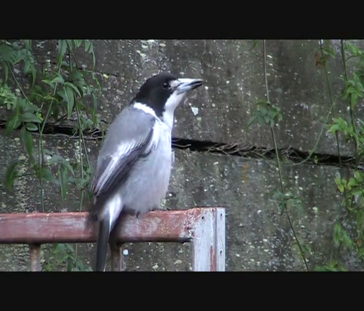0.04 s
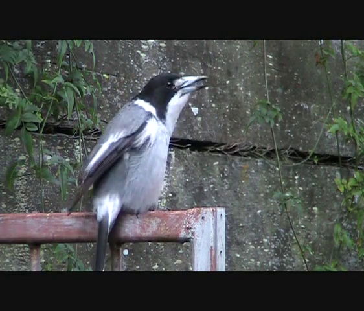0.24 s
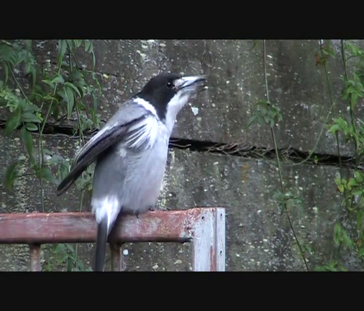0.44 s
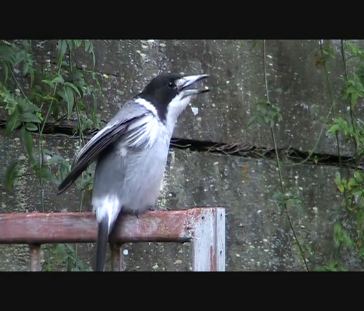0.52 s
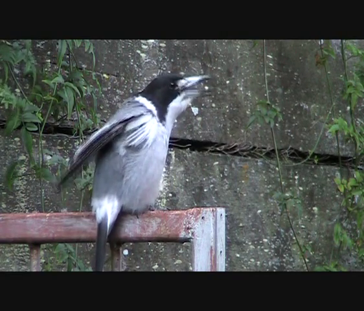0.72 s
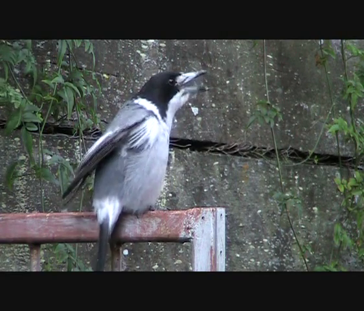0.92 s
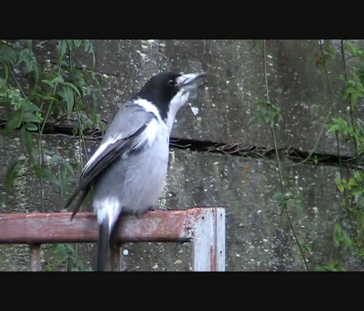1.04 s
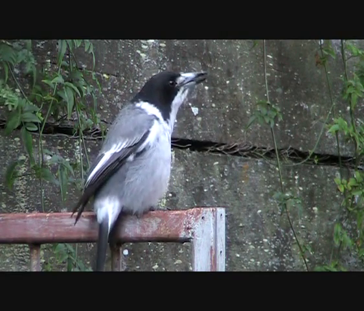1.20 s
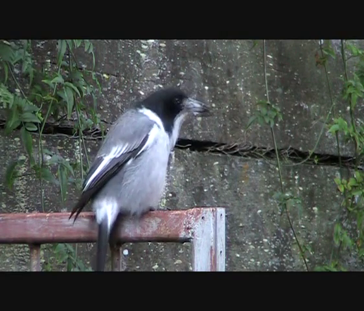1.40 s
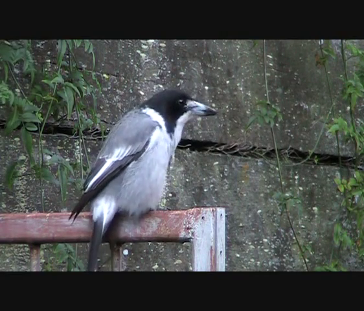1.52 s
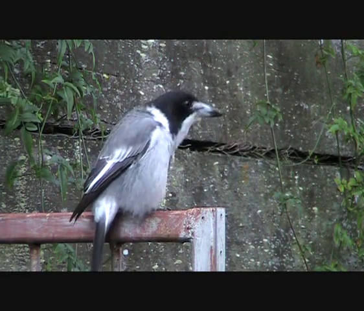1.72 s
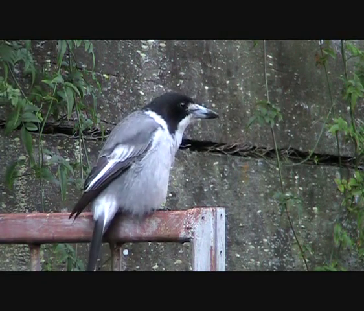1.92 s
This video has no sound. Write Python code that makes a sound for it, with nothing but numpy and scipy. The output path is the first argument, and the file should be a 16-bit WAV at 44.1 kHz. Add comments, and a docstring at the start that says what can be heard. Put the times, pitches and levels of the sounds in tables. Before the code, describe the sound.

A bird gives harsh rasps, whistles and a soft hoot close by outdoors.

```python
"""In a garden, a butcherbird calls from a rail close by: two harsh rasps that climb in steps, a run of
rough whips and high whistles with the beak wide open, then a soft hoot and a piping note with it nearly
shut. The two sides of its voice box (the syrinx) beat against each other, and its throat and beak shape
the tone. A wall and the yard answer the calls over soft outdoor air and a quiet rumble."""
import sys
import numpy as np
from scipy import signal
from scipy.fft import rfft, irfft, next_fast_len
from scipy.io import wavfile
from scipy.ndimage import uniform_filter1d, minimum_filter1d, map_coordinates

SR = 44100
rng = np.random.default_rng(int(sys.argv[2]) if len(sys.argv) > 2 else 0)


def unload_audio(sound):
    """Save the sound as a 16-bit wav file, at the path given as the first command line argument."""
    columns = np.transpose(np.atleast_2d(sound))
    # keep every value between -1 and 1, then stretch to whole-number steps
    steps = np.round(np.clip(columns, -1, 1) * 32767)
    wavfile.write(sys.argv[1], SR, steps.astype(np.int16))


N = 85995
TIME = np.arange(N) / SR


# One path per rasp (time [s], pitch [Hz], body level [dB], treble level [dB], roughness [1 = full])
RASP_PATHS = [
    [(.207, 621.8, -37.5, -66, 1.22), (.237, 713, -21.5, -46.5, 0.49), (.27, 709.8, -22.5, -41.5, 0.36),
     (.314, 766, -16.5, -40, 0.23), (.324, 879.4, -26, -36.5, 1.06), (.341, 826.3, -14.5, -33.5, 0.86),
     (.353, 790, -16.5, -34.5, 0.01), (.384, 807, -13.5, -35, 0.25), (.392, 852, -15, -30, 0.41),
     (.423, 912.7, -13.5, -27, 0.39), (.43, 1103, -18.5, -34.5, 0.51), (.44, 956, -25.5, -31, 1.1)],
    [(.556, 903, -23, -46, 0.52), (.568, 891.6, -16, -32.5, 0.39), (.598, 826.3, -16, -32.5, 0.39),
     (.614, 905, -12.5, -33, 0.22), (.645, 882.7, -16.5, -28, 0.27), (.654, 948, -13.5, -34.5, 0.24),
     (.668, 955, -12.5, -30, 0.32)],
]
# How the throat and the open beak shape a rasp (frequency [Hz], gain [dB])
RASP_THROAT_SHAPE = [(400, -57), (680, -10.5), (900, -23.5), (1100, -8.5), (1400, 2), (1750, 2.5),
                     (2200, -8.5), (2600, -12), (3400, -18.5), (4000, -40.5)]
RASP_BEAK_SHAPE = [(2700, -21), (3500, -8), (4800, -11.5), (6100, 4), (7000, -5.5), (7900, 1.5),
                   (11000, -8.5), (13000, -10), (15500, -22)]

def rasps():
    """Two harsh, hissy calls that climb in steps."""
    return sum(call(path, RASP_THROAT_SHAPE, RASP_BEAK_SHAPE, hiss=5) for path in RASP_PATHS)


# Flick and whip paths (time [s], pitch [Hz], body level [dB], treble level [dB], roughness [1 = full])
FLICK_PATH = [(.676, 1036, -16, -27.5, 0.45), (.693, 1153, -18.5, -30, 0.42), (.714, 958, -27.5, -30, 0.79)]
WHIP_PATHS = [
    [(.794, 1077, -31, -43, 0.22), (.808, 1039, -20.5, -35, 0.55), (.819, 1515, -11, -21, 0.48),
     (.828, 1697, -17.5, -20, 0.5), (.846, 1660, -32, -40, 0.35)],
    [(1.142, 1101, -27.5, -46.5, 0.44), (1.16, 1080, -21.5, -33, 0.72), (1.172, 1230, -26, -26, 0.81),
     (1.181, 1443, -13, -25.5, 0.57), (1.197, 1599, -9, -28.5, 0.65), (1.203, 1712, -10.5, -36, 0.45)],
]
# The throat for whips and whistles, and the beak for flick and whips (frequency [Hz], gain [dB])
HIGH_THROAT_SHAPE = [(600, -46), (1050, -5.5), (1800, -0.5), (2350, -7), (2900, -15.5), (3400, -30.5),
                     (5000, -71)]
WHIP_BEAK_SHAPE = [(2900, -39), (3600, -3), (5500, -8.5), (7400, 5.5), (8800, -7), (10500, -2),
                   (15500, -30)]

def whips(hiss=2.2):
    """A short flick ends the second rasp, then two rough calls sweep quickly upward."""
    flick = call(FLICK_PATH, RASP_THROAT_SHAPE, WHIP_BEAK_SHAPE, hiss)
    return flick + sum(call(path, HIGH_THROAT_SHAPE, WHIP_BEAK_SHAPE, hiss) for path in WHIP_PATHS)


# One path per whistle (time [s], pitch [Hz], body level [dB], treble level [dB], roughness [1 = full])
WHISTLE_PATHS = [
    [(.837, 2122, -18, -25, 0.43), (.847, 2295, -17.5, -23.5, 0.43), (.856, 2434, -26.5, -20.5, 0.15),
     (.876, 2426, -27.5, -27.5, 0.15)],
    [(.912, 2242, -19, -32, 0.12), (.92, 2200, -27, -38, 0.17), (.929, 2235, -11, -26.5, 0.11),
     (.942, 2317, -22.5, -22, 0.086), (.958, 2345, -32, -29.5, 0.071), (.966, 2270, -41, -42, .12)],
    [(1.012, 2195, -19, -37, 0.17), (1.024, 2394, -22, -24, 0.17), (1.032, 2164, -11, -33, 0.19),
     (1.042, 1981, -24.5, -20.5, 0.1), (1.054, 1900, -5.5, -24, 0.24), (1.068, 1778, -13.5, -29.5, 0.13)],
]
# How the open beak shapes a whistle (frequency [Hz], gain [dB])
WHISTLE_BEAK_SHAPE = [(3000, -31), (3800, -6.5), (4700, 3), (5600, -2.5), (7300, 2), (11400, -8),
                      (15000, -24)]

def whistles():
    """Three short, high notes through the wide-open beak."""
    return sum(call(path, HIGH_THROAT_SHAPE, WHISTLE_BEAK_SHAPE, hiss=4) for path in WHISTLE_PATHS)


# The closing notes (time [s], pitch [Hz], body level [dB], treble level [dB], roughness [1 = full])
REEDY_PATH = [(1.452, 735, -49, -66, .09), (1.468, 761.4, -30.5, -59, .1), (1.493, 748.6, -32.5, -60, .12)]
HOOT_PATH = [(1.446, 753, -46.5, -73, 0.072), (1.494, 746.4, -25, -71, 0.14),
             (1.536, 798.4, -18.5, -51, 0.028), (1.566, 813.4, -19, -54.5, 0.031),
             (1.6, 783, -21, -66, 0.078), (1.611, 772, -31, -74, 0.13)]
PIPE_PATH = [(1.719, 1021, -23, -44, .35), (1.728, 1059, -11.5, -43.5, 0.14),
             (1.75, 1072, -9.5, -39, 0.035), (1.757, 1064, -11.5, -45, 0.037),
             (1.774, 1051, -13.5, -40, 0.081), (1.785, 1076, -21, -62.5, 0.16),
             (1.806, 1150, -25, -58, 0.46), (1.84, 990, -35.5, -61.5, 0.62), (1.878, 783, -25.5, -65, 0.56),
             (1.895, 762, -34, -79, 0.87)]
# How the throat and beak shape those notes (frequency [Hz], gain [dB])
REEDY_THROAT_SHAPE = [(750, -37), (1500, 3), (2300, -2.5), (3400, -42)]
SHUT_THROAT_SHAPE = [(400, -4), (750, 7.5), (1100, .5), (1550, -13), (2100, -30.5), (2400, -27),
                     (3200, -40.5), (6000, -81)]
HOOT_BEAK_SHAPE = [(6000, -20), (7300, 7), (8000, -6), (9000, -19)]
PIPE_BEAK_SHAPE = [(2800, -45), (4300, -5), (5400, 0), (6400, 9), (8000, -9.5), (9600, -3.5), (14000, -6),
                   (15500, -11)]

def hoot_and_pipe():
    """The hoot starts reedy with the throat open; then the throat narrows for the rest of it and for the piping
    note."""
    reedy_start = call(REEDY_PATH, REEDY_THROAT_SHAPE, HOOT_BEAK_SHAPE)
    hoot = call(HOOT_PATH, SHUT_THROAT_SHAPE, HOOT_BEAK_SHAPE)
    pipe = call(PIPE_PATH, SHUT_THROAT_SHAPE, PIPE_BEAK_SHAPE)
    return reedy_start, hoot + pipe


def syrinx(hz, rough, count=20):
    """One side of the voice box: equally loud harmonics (multiples of a shaky pitch), one row each."""
    jitter = 0.0656 * wobble(704.2, len(hz))
    waver = 0.0487 * wobble(219.7, len(hz))
    pitch = hz * (1 + rough * (jitter + waver))
    harmonic = np.arange(1, count + 1)[:, None]
    phase = 2 * np.pi * (harmonic * np.cumsum(pitch) / SR + rng.random(harmonic.shape))
    return np.sqrt(2) * np.sin(phase) * (harmonic * pitch < SR / 2)


ATTACK_S, RELEASE_S = .005, .011
FLUTTER_DB, FLICKER_DB = 4, 4.5  # random swings of the whole call, and of each harmonic in the treble
BREATH = 0.57  # rushing air compared with the tone, at full roughness

def call(path, throat, beak, hiss=BREATH):
    """One call in two layers: the throat sounds its low body, the beak its treble."""
    times, *columns = np.transpose(path)
    fade_in = np.clip((TIME - times[0]) / ATTACK_S + 1, 0, 1)
    fade_out = np.clip((times[-1] - TIME) / RELEASE_S + 1, 0, 1)
    fade = fade_in * fade_out
    on = fade > 0
    hz, body_db, treble_db, rough = [np.interp(TIME[on], times, column) for column in columns]
    rough = np.clip(rough, 0, 1)
    # The second side sings a little lower and beats against the first.
    harmonics = (syrinx(hz, rough) + rough * syrinx(hz * .925, rough)) / np.hypot(1, rough)
    loudness = fade[on] * amp(FLUTTER_DB * rough * wobble(210.5, len(hz)))
    flicker = amp(FLICKER_DB * np.array([wobble(29.4, len(hz)) for _ in harmonics]))
    flickering = harmonics * flicker / np.sqrt(np.mean(flicker ** 2, axis=0))

    def layer(tones, shape, level_db, breath):
        """Tones and rushing air pass through the throat or the beak."""
        air_share = breath * rough ** 2
        air = air_share * rng.standard_normal(len(hz)) * np.sqrt(SR / 2 / hz)
        tone_hz = np.arange(1, len(tones) + 1)[:, None] * hz
        # Divide out what the shape and the air add, so level_db sets the loudness.
        boost = np.linalg.norm(amp(curve_at(shape, tone_hz)), axis=0) * np.hypot(1, air_share)
        buzz = np.zeros(N)
        buzz[on] = (tones.sum(0) + air) * loudness * amp(level_db) / boost
        return shaped(buzz, shape)

    body = layer(harmonics[:3], throat, body_db, BREATH)
    treble = layer(flickering, beak, treble_db, hiss)
    return np.array([body, treble])


# How far the left wave runs ahead of the right (frequency [Hz], phase lead [rad])
LEFT_LEAD = [(4000, 0.21), (7000, 0.56), (14000, 2.12)]

def direct_sound(voice):
    """The voice arrives straight from the bird, slightly out of step between left and right."""
    sides = np.array([[.5], [-.5]])
    return filtered(voice, lambda hz: np.exp(1j * sides * curve_at(LEFT_LEAD, hz)))


# Bounces off nearby surfaces (delay [s], level [dB])
NEAR_BOUNCES = [(.0112, -9), (.0205, -14.5)]

def wall_echo(voice):
    """Weak, early copies from the ground and the wall behind the bird, one from each side."""
    lag_s = 0.000092 * np.array([[.5], [-.5]])
    return sum(amp(db) * delayed(voice, delay_s + (-1) ** k * lag_s)
               for k, (delay_s, db) in enumerate(NEAR_BOUNCES))


# How long the yard rings (frequency [Hz], time to fade by 60 dB [s])
YARD_FADE = [(800, 0.32), (1700, 0.42), (8000, 0.23), (15000, 0.1)]

def yard_echo(voice):
    """Many bounces blur into one tail, each frequency dying at its own speed."""
    hz, t, spectrum = signal.stft(rng.standard_normal((2, SR * 3 // 4)), SR, nperseg=256)
    fade = amp(-60 * t / curve_at(YARD_FADE, hz)[:, None])
    tail = signal.istft(spectrum * fade, SR, nperseg=256)[1]
    tail = tail + 0.45 * tail[::-1]  # left and right partly blend
    tail = unit_level(tail) / np.sqrt(tail.shape[1])
    echo = signal.fftconvolve(voice[None], tail, axes=1)[:, :N]
    return delayed(echo, seconds=.007)


# The tone of the outdoor air (frequency [Hz], gain [dB])
AIR_SHAPE = [(20, -30), (35, 2), (130, -0.5), (450, -8), (750, -4), (1150, -7.5), (1700, -8), (2600, -15),
             (5000, -21.5), (15500, -41.5)]
# How alike it is on the left and right (frequency [Hz], likeness [0-1])
AIR_LIKENESS = [(110, 0.72), (250, 0.63), (8000, 0.25)]

def outdoor_air():
    """A soft, steady rush that sounds wider in the treble than in the bass."""
    def spread(hz):
        return np.arccos(curve_at(AIR_LIKENESS, hz)) / 2

    middle = filtered(noise(AIR_SHAPE), lambda hz: np.cos(spread(hz)))
    side = filtered(noise(AIR_SHAPE), lambda hz: np.sin(spread(hz)))
    return amp(-43.5) * unit_level(np.array([middle + side, middle - side]))


# Far-off tones (pitch [Hz], level [dB])
HUM_TONES = [(651, -52.5), (1620, -50)]

def distant_hums(waver_hz=28):
    """Two faint tones that waver at random."""
    hums = np.zeros(N)
    for hz, db in HUM_TONES:
        phase = 2 * np.pi * hz * TIME
        hums += amp(db) * (wobble(waver_hz) * np.sin(phase) + wobble(waver_hz) * np.cos(phase))
    return hums


# The tone of the rumble (frequency [Hz], gain [dB])
RUMBLE_SHAPE = [(40, -24), (66, 14), (100, -6.5), (200, -39)]
# Its loudness (time [s], level [dB])
RUMBLE_SWELL = [(1.3, -57.5), (1.549, -48), (1.95, -52)]

def rumble():
    """A low rumble that swells in the second half."""
    return noise(RUMBLE_SHAPE) * amp(np.interp(TIME, *np.transpose(RUMBLE_SWELL)))


def amp(db):
    """Turn decibels into a multiplier."""
    return 10 ** (np.asarray(db) / 20)


def unit_level(sound):
    """Scale a sound to an average (rms) level of 1."""
    return sound / np.sqrt(np.mean(sound ** 2) + 1e-20)


def curve_at(points, hz):
    """Read between a table's (frequency, value) points, with octaves evenly spaced."""
    frequencies, values = np.transpose(points)
    return np.interp(np.log(hz + 1), np.log(frequencies + 1), values)


def wobble(rate_hz, size=N):
    """A smooth curve through rate_hz random points a second."""
    return map_coordinates(rng.standard_normal(N // 8), [np.arange(size) * rate_hz / SR], mode="wrap")


def filtered(sound, response):
    """Multiply each frequency in a sound by response(hz)."""
    size = next_fast_len(N + SR // 2)
    return irfft(rfft(sound, size) * response(np.fft.rfftfreq(size, 1 / SR)), size)[..., :N]


def shaped(sound, shape):
    """Turn frequencies up or down by a table of gains."""
    return filtered(sound, lambda hz: amp(curve_at(shape, hz)))


def delayed(sound, seconds):
    """The same sound, arriving later."""
    return filtered(sound, lambda hz: np.exp(-2j * np.pi * hz * seconds))


def noise(shape):
    """Noise with the given tone, at level 1."""
    return unit_level(shaped(rng.standard_normal(N), shape))


def scene():
    """The bird and its echoes over the quiet garden, in stereo."""
    open_calls = rasps() + whips() + whistles()
    reedy_start, (shut_body, shut_treble) = hoot_and_pipe()
    open_body, open_treble = open_calls + reedy_start
    treble = open_treble + shut_treble
    voice = open_body + shut_body + treble
    wall = wall_echo(open_body + treble)
    far_bounce = amp(-18.5) * delayed(voice, seconds=.04)  # one clear echo from across the yard
    yard = yard_echo(amp(-12) * open_body + amp(-7.5) * treble + amp(-17.5) * shut_body)
    return direct_sound(voice) + wall + far_bounce + yard + outdoor_air() + distant_hums() + rumble()


def record(dry):
    """A limiter holds down the highest peaks, and the very top of the treble is cut off."""
    ceiling, top_hz = .88, 15800
    window = int(.004 * SR)
    needed_gain = ceiling / np.maximum(np.abs(dry).max(0), ceiling)
    gain = uniform_filter1d(minimum_filter1d(needed_gain, 2 * window), window)
    return filtered(dry * gain, lambda hz: hz < top_hz)


dry = scene()
out = record(dry)
unload_audio(out)
```